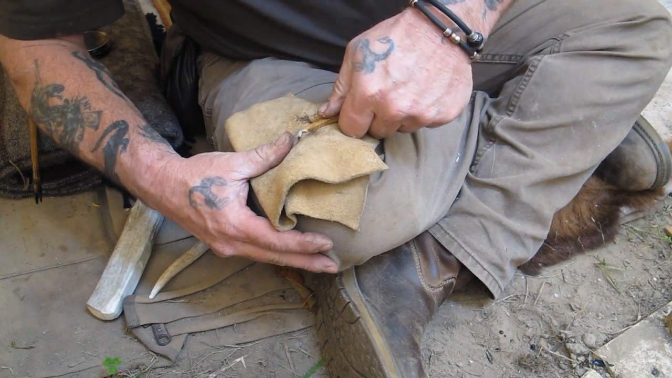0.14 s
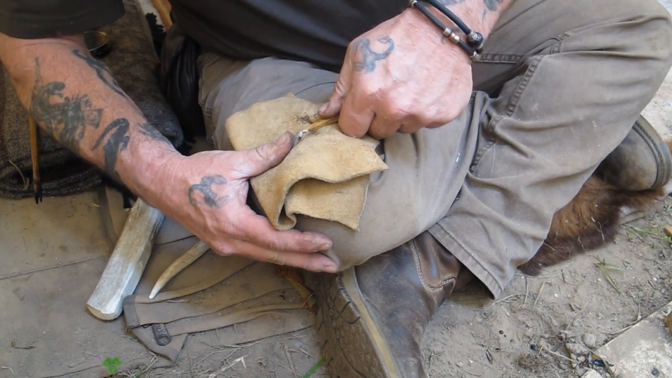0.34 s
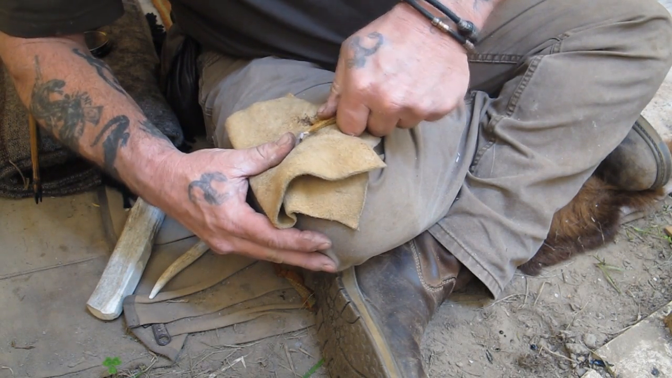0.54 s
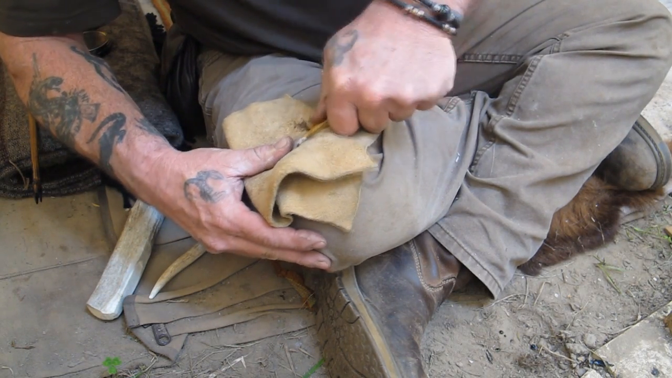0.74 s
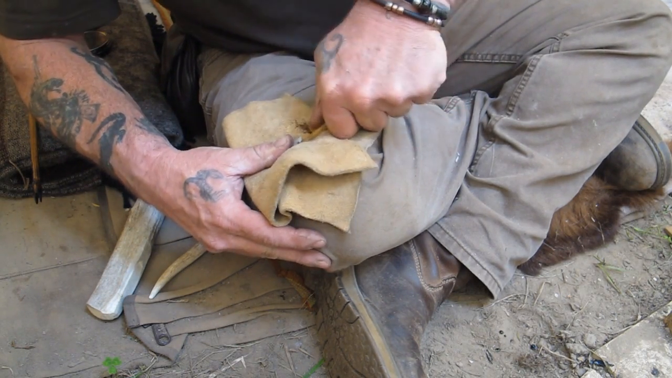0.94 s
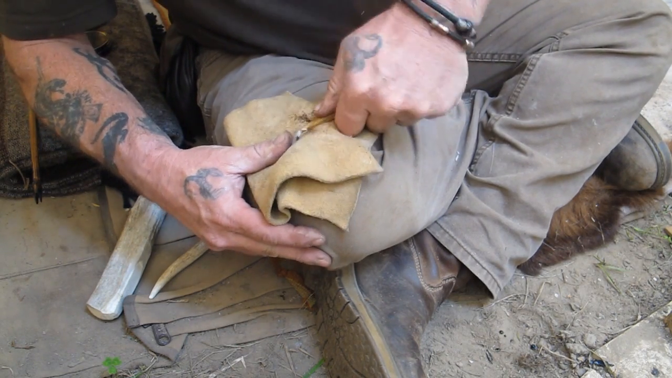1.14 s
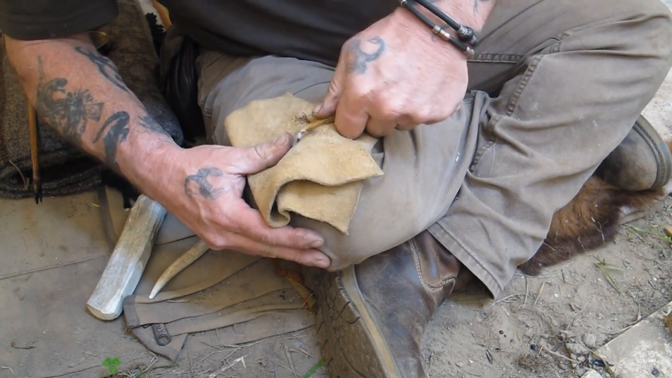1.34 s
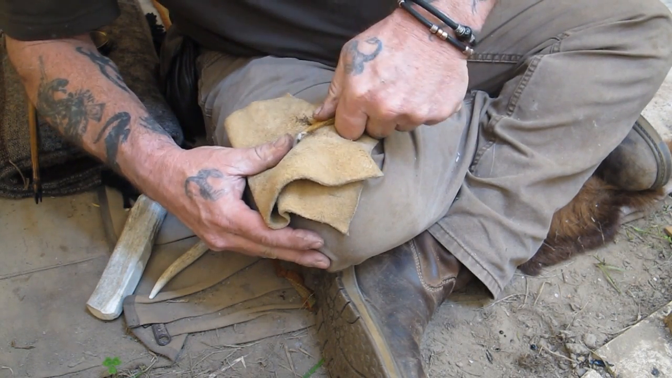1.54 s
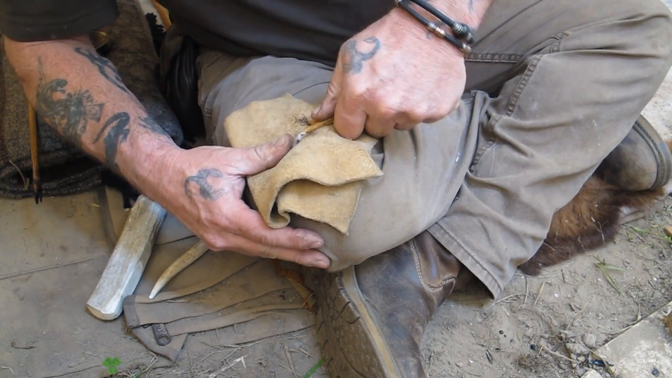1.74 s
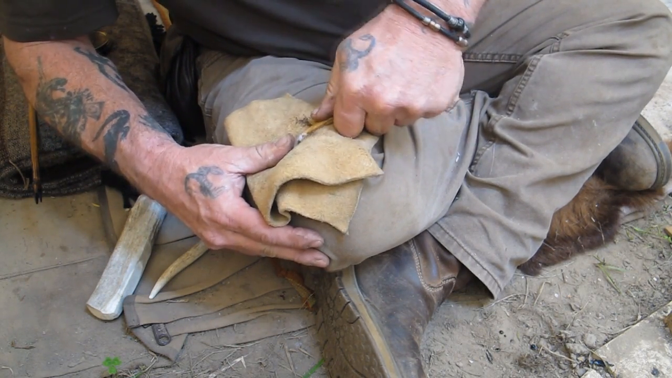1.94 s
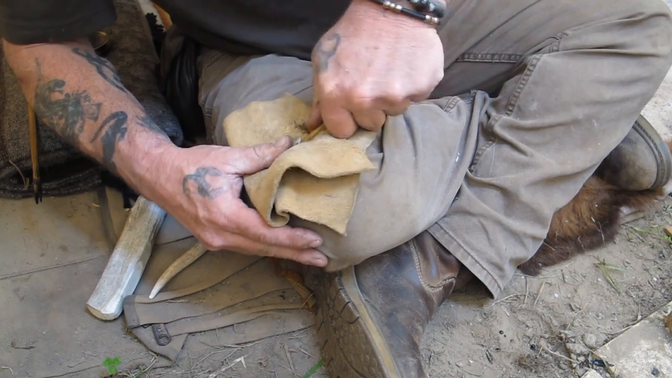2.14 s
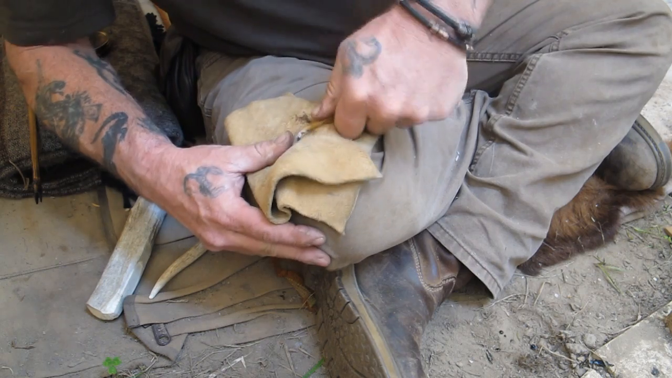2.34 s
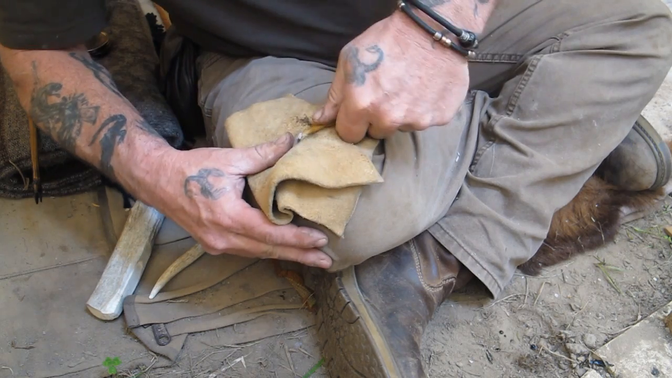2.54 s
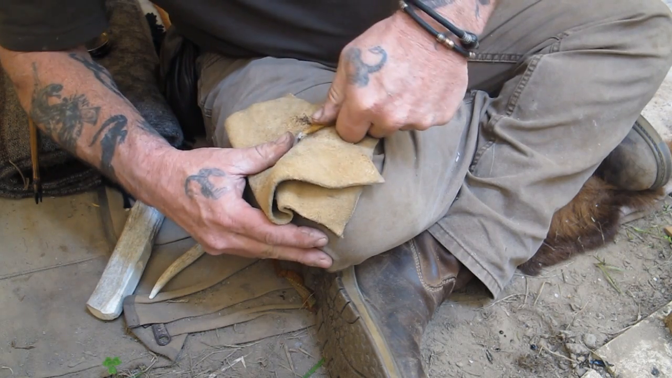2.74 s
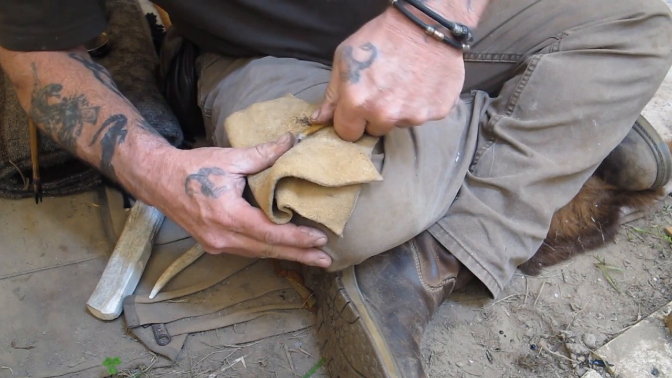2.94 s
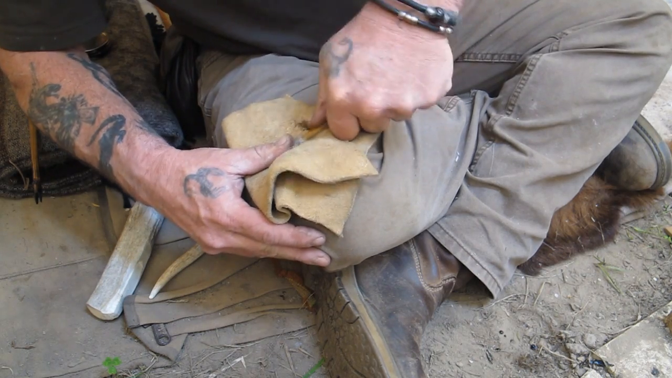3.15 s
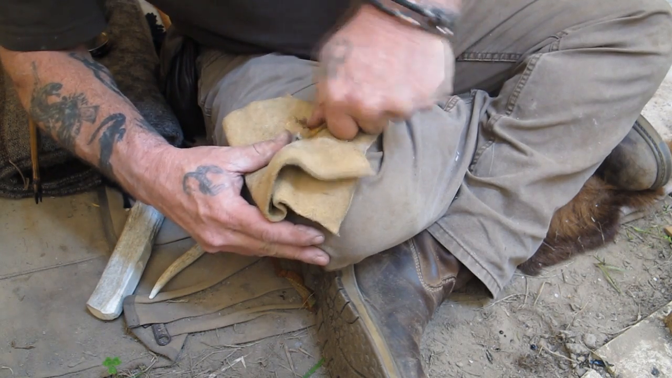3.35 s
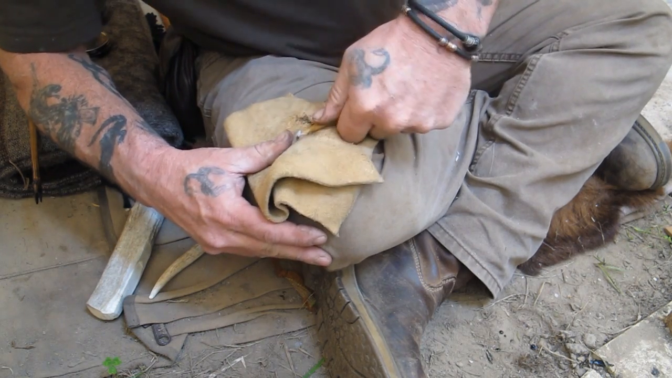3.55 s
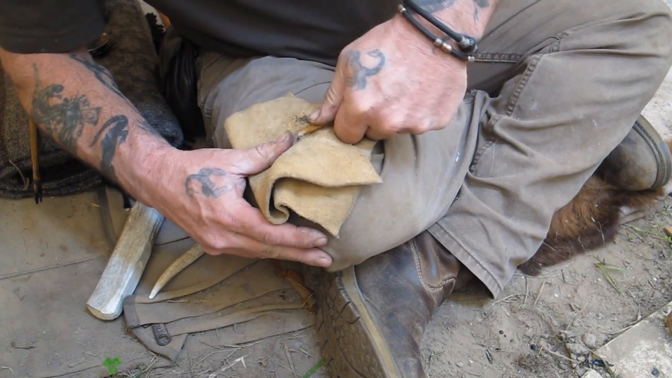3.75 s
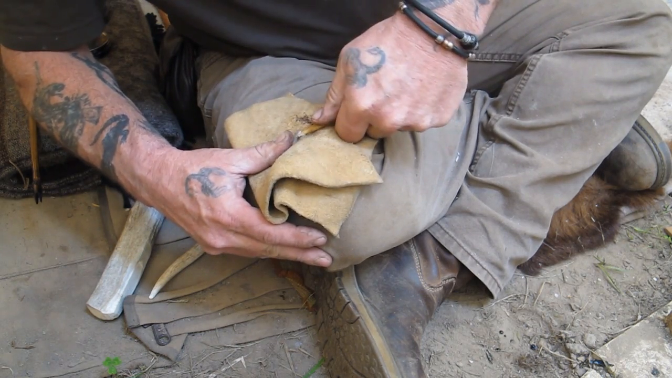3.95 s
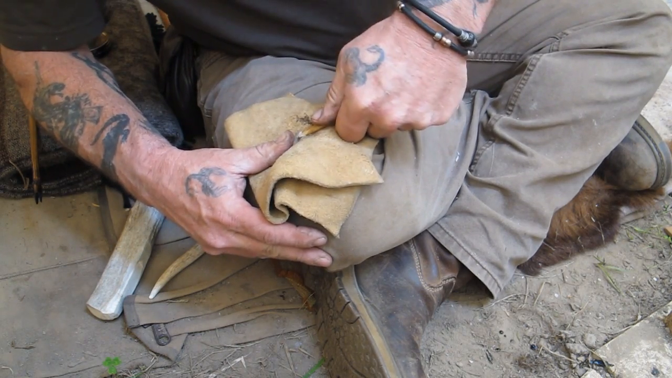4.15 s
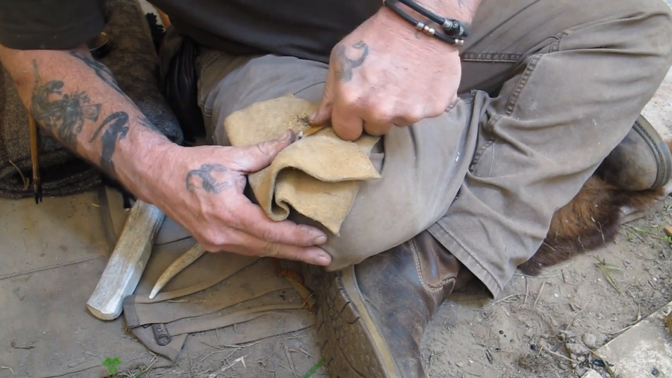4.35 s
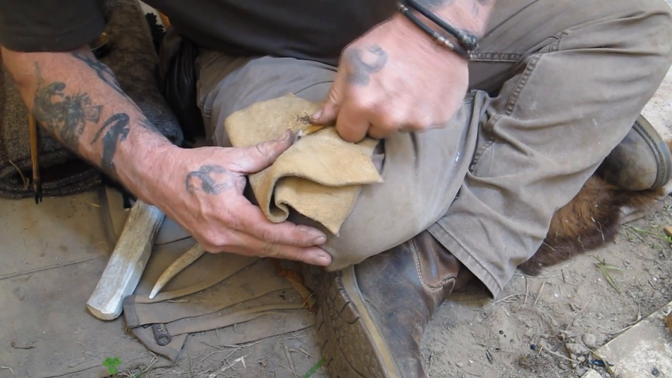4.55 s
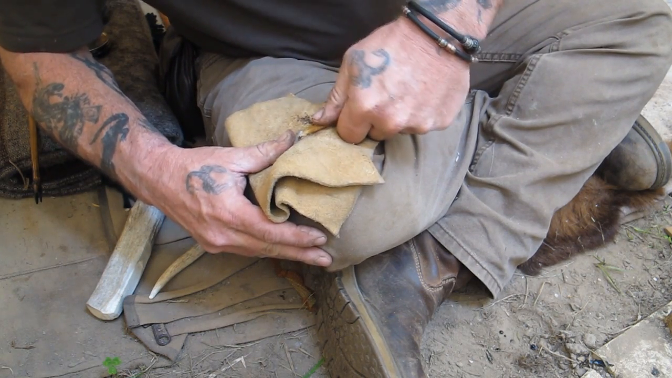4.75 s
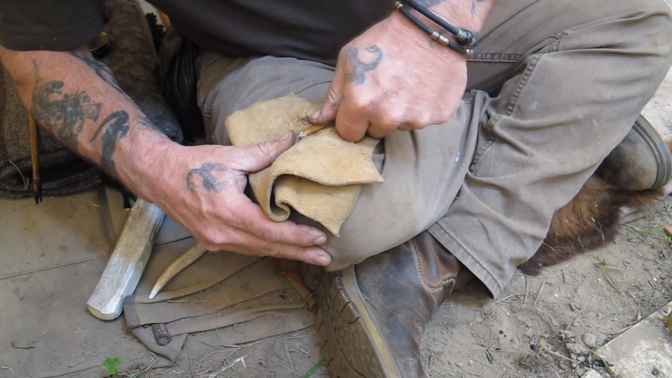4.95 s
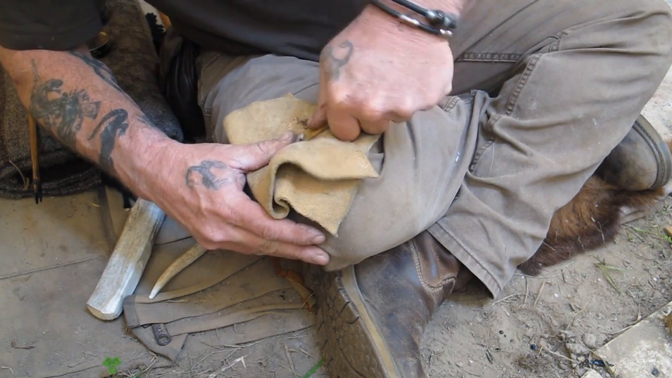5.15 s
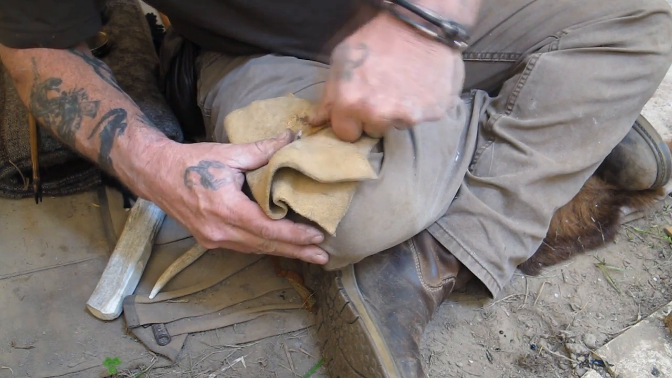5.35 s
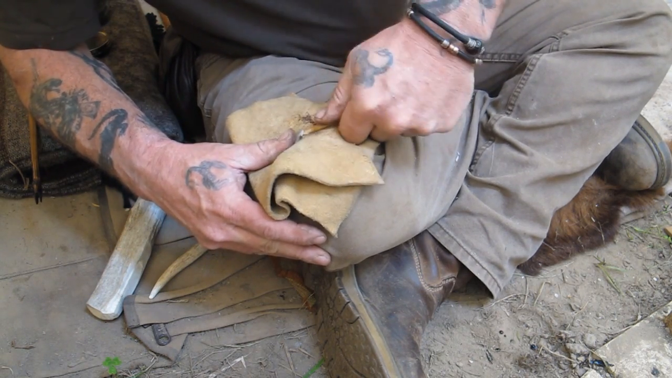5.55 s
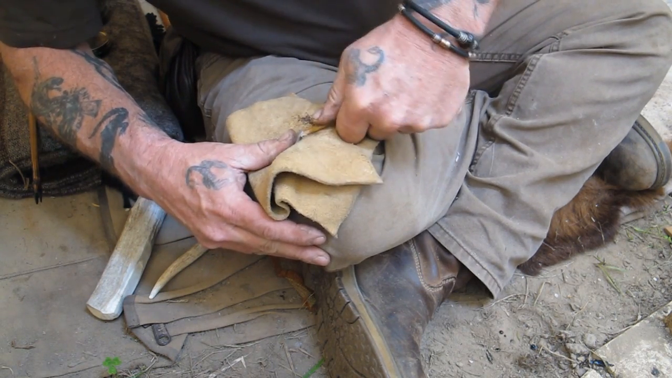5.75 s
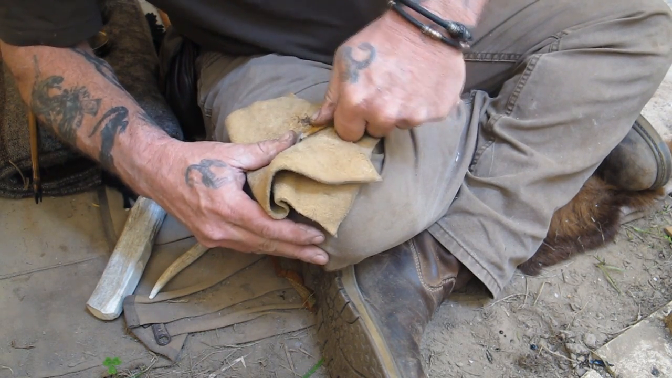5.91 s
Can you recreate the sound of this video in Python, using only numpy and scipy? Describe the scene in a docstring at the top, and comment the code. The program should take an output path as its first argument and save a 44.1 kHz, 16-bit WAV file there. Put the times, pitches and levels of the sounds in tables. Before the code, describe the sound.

Sharp, glassy snaps of stone flaking about once a second, with tiny ticking crumbs and faint leather creaks in a quiet yard.

```python
"""Small flakes snap off a stone point as an antler tine presses on it, over a leather pad on a knee.
Each flake is two close impulses that ring a bank of pad, tine and stone resonances.
Crumbs and grit are tiny impulses; the tine's one slide and the creaking leather are shaped noise.
A quiet yard adds a ground bounce, a short noise tail, air, a hum, a whine and far-off pulsing tones.
The recorder overloads on the hardest snaps and turns its gain down for a moment."""
import sys
import numpy as np
from scipy import signal
from scipy.io import wavfile
from scipy.ndimage import uniform_filter1d

SR = 44100
rng = np.random.default_rng(int(sys.argv[2]) if len(sys.argv) > 2 else 0)


def to_wav(sig):
    """Store sig (one row per channel, or 1-D mono) as 16-bit WAV at the path in sys.argv[1].

    Samples outside -1..1 are clipped; the rate is SR.
    """
    pcm = np.clip(np.atleast_2d(sig), -1, 1) * 32767
    pcm = np.round(pcm).astype(np.int16)
    wavfile.write(sys.argv[1], SR, pcm.T)  # frames by channels


N = 268128
TIME = np.arange(N) / SR
STONE_HZ, STONE_FROM_HZ = 5250, 4000   # the stone's main pitch; resonances above 4000 Hz belong to the stone
RING_SIZE = 1024   # samples in one strike
CUTOFF_HZ = 16000


def flakes(echo_blur=3.2, echo_shift=1.07, echo_db=-10):
    """A flake starts and breaks free in two cracks; returns the direct sound and a broader one for the yard."""
    # The flakes: start_s, pad_thud_db, tine_knock_db, body_db, stone_ring_db, chip_edge_db,
    # stone_pitch_hz, top_hz, second_crack_lag_ms, second_crack_db (against the first crack)
    snaps = [(0.9793, 7.5, 17.5, 13, 22.5, 4.5, 5230, 14700, 0.85, -13),
             (2.1806, 11, 8, -1.5, 13.5, 3, 5380, 8440, 0.97, 10),
             (2.2282, -16, -15, -3, 9, 9, 5000, 12400, 0.82, -7),
             (3.282, 4.5, 18, 8.5, 20.5, 6.5, 5250, 14100, 0.61, -17.5),
             (4.379, -12, -5, 12, 19, 6, 5040, 8440, .9, 8.5),
             (4.678, -22, -2, -3, -5.5, -34, 4980, 7500, 0.804, -9),
             (5.2444, 8, 17.5, -10.5, 19, 8, 5110, 11400, 0.24, 8)]
    # The pitches where the five levels above apply, from pad thud to chip edge: pitch_hz
    register_hz = [400, 1300, 2900, 5100, 8200]
    direct, sent = np.zeros((2, 2, N))
    for start_s, *register_db, stone_hz, top_hz, lag_ms, second_db in snaps:
        levels = list(zip(register_hz, register_db))
        level_db_at = lambda hz: at_hz(levels, hz)
        # a slower break is duller
        force = butter(clicks(lag_ms, second_db), top_hz, "low", order=6)
        add(direct, start_s, strike(force, level_db_at, stone_hz))
        echo = strike(force, level_db_at, stone_hz * echo_shift, echo_blur)
        add(sent, start_s, from_db(echo_db) * echo)
    return direct, sent


def clicks(lag_ms, second_db):
    """Two impulses that share one unit of energy."""
    at = np.arange(RING_SIZE)
    first = at == 0
    second = at == round(abs(lag_ms) * SR / 1000)
    pair = first + from_db(second_db) * second
    return pair / np.sqrt(np.sum(pair ** 2))


def strike(force, level_db_at, stone_hz=STONE_HZ, blur=1):
    """A force rings pad, tine and stone; the grip shifts the stone's pitch, blur widens every resonance."""
    # Pad, tine and stone, damped by the hand: pitch_hz (stone rows shift), width_hz (before blur),
    # level_db (before the force's own level), left_minus_right_db
    resonances = [(394, 98, 7, 1), (644, 83, -11.5, 2), (975, 61, -3, 3.5), (1174, 88, 3, 0),
                  (1514, 290, -0.5, -3.5), (1817, 263, 4.5, 2), (2745, 630, 0, -1.5), (3360, 1080, -5, 0),
                  (4490, 510, 4.5, 5.5), (5250, 307, 10.5, 5), (6420, 430, -6, -18), (7400, 660, 0.5, -9),
                  (8900, 570, 2, -7), (10480, 1960, -4.5, 0.5), (14870, 2000, -17, 4)]
    # How much later the treble reaches the left ear: pitch_hz, lag_ms
    ear_lag = [(3000, 0), (4600, .015), (5300, .05), (9000, .02)]
    out, at = np.zeros((2, RING_SIZE)), np.arange(RING_SIZE)
    for k, (hz, width, db, side_db) in enumerate(resonances):
        pitch, sign = hz, 1   # pad and tine move with the force
        if hz > STONE_FROM_HZ:
            # the stone's resonances alternate in sign
            pitch, sign = hz * stone_hz / STONE_HZ, (-1) ** (k + 1)
        gain = from_db(db + level_db_at(hz)) / np.sqrt(blur)
        right = resonate(force, pitch, width * blur) * gain
        lag_samples = at_hz(ear_lag, hz) * SR / 1000
        left = np.interp(at - lag_samples, at, right, left=0)
        out += sign * pan(side_db) * [left, right]
    return out


def crumbs(level_db=18, rebound_ms=4.5, rebound_db=-12, onset_s=0.00063):
    """Crumbs break off the edge, singly or in a short fading run; the tine catches again just after each."""
    # The edge crumbles under the tine: start_s (before onset_s), level_db (before level_db is added),
    # centre_hz, run_s (length of the run of grains; 0 is a single grain)
    ticks = [(0.6657, -31, 1030, 0), (1.2057, -39.5, 5100, .039), (2.142, -35.5, 4700, 0.003),
             (2.384, -35, 4770, 0.0057), (2.971, -31, 4440, 0), (3.2224, -26, 5200, 0),
             (3.276, -24, 5000, .003), (3.3208, -20.5, 5200, 0), (3.9972, -28, 2100, 0.018),
             (4.4424, -25.5, 7350, 0.0013), (4.485, -35.5, 4870, 0), (4.684, -26, 4400, .008),
             (4.8761, -35, 4740, 0), (5.1446, -35.5, 5200, .027), (5.24, -22, 5470, 0),
             (5.5126, -37, 2100, 0.0014), (5.7958, -37.5, 4930, 0), (5.847, -33.5, 7460, 0.0081),
             (5.98, -39, 7400, 0.0035)]
    longest_gap_s, fade_db_per_s = .015, 130   # within a run; later grains are weaker
    out = np.zeros((2, N))
    for start_s, tick_db, centre_hz, run_s in ticks:
        grain_count = 1 + int(np.ceil(run_s / longest_gap_s))
        for after_s in np.linspace(0, run_s, grain_count):
            db = tick_db + level_db - fade_db_per_s * after_s
            crumb = chip(clicks(rebound_ms, rebound_db), db, centre_hz)
            add(out, start_s + onset_s + after_s, crumb)
    return out


def chip(force, db, centre_hz, below_db=14, above_db=6, top_ratio=1.87):
    """A tiny chip excites the resonances near its own pitch; a low, soft touch has little treble."""
    def level_db_at(hz):
        """Fall away from the centre by below_db or above_db per octave."""
        octaves = np.log2(hz / centre_hz)
        return db + min(below_db * octaves, -above_db * octaves)
    top_hz = min(top_ratio * centre_hz, CUTOFF_HZ)
    return strike(butter(force, top_hz, "low", order=3), level_db_at)


def grit(level_db=-34, spread_db=6, centre_hz=5500, rebound_ms=3, rebound_db=-6, count=36):
    """Faint grains of stone crush under the tine at random moments."""
    out = np.zeros((2, N))
    for when, size, pitch in 2 * rng.random((count, 3)) - 1:   # each from -1 to 1
        start_s = (when + 1) / 2 * N / SR
        grain_hz = centre_hz * 2 ** (pitch / 2)   # up to half an octave either way
        grain_db = level_db + spread_db * size
        add(out, start_s, chip(clicks(rebound_ms, rebound_db), grain_db, grain_hz))
    return out


def slide(low_hz=1400, high_hz=6000, grains_per_s=4000, ring_width=600, ring_db=-3):
    """The tine drags along the edge to its first seat: dense fine grains, with a little of the stone's ring."""
    start_s, length_s, attack_s, release_s, level_db = 0.613, 0.19, .03, 0.28, -60
    grains = rng.standard_normal(N) * (rng.random(N) < grains_per_s / SR)
    rub = butter(grains, [low_hz, high_hz], "band")
    rub = rms_one(rub + from_db(ring_db) * resonate(rub, STONE_HZ, ring_width))
    return from_db(level_db) * swell(start_s, length_s, attack_s, release_s) * rub * pan(1.5)


def leather(slip_s=0.0098, uneven=0.17, steady=0.44):
    """The pad sticks and slips under the hand; each slip is a short dull rub."""
    # Resonances of the leather: pitch_hz, width_hz, level_db (against each other, before tilt)
    leather_modes = [(660, 260, 7.5), (1410, 390, -2), (1610, 160, -0.5), (2790, 336, -10.5)]
    # The hand bears down: start_s, length_s (before the release), level_db, tilt_db_per_octave
    presses = [(2.422, .3, -59.5, 5), (3.479, .5, -55, -2.5), (4.64, .27, -58, 3.5)]
    attack_s, release_s = 0.16, 0.17
    grip_from_s, grip_db = 2.1, -64   # from here on the grip keeps the pad under light strain
    slips_per_s, slowing = 28, 0.31   # under the light grip; a harder press sticks longer (exponent)
    grip = from_db(grip_db) * swell(grip_from_s, N / SR, attack_s, release_s)
    pushes = [from_db(db) * swell(start_s, length_s, attack_s, release_s)
              for start_s, length_s, db, _ in presses]
    strain = np.maximum(grip, sum(pushes))
    load = np.maximum(strain, from_db(grip_db))
    tilt_db = sum(push * row[-1] for push, row in zip(pushes, presses)) / load
    rate = slips_per_s * (from_db(grip_db) / load) ** slowing
    slip_count = np.cumsum(rate * np.exp(uneven * drift(10))) / SR
    since_slip = slip_count % 1 / rate
    rub = rng.standard_normal(N) * (steady + np.exp(-since_slip / slip_s))
    body = 0
    for hz, width, db in leather_modes:
        mode_gain = from_db(db + tilt_db * np.log2(hz / 1000))
        patchy_rub = rub * from_db(3.4 * drift(14))
        body = body + mode_gain * resonate(patchy_rub, hz, width)
    return strain * rms_one(body)


def yard(x, t60=0.074, gap_s=0.0014, wide_hz=2200, dull_hz=11000):
    """Ground, body and nearby things scatter a brief tail, alike in both ears in the bass."""
    t = TIME[:SR // 4]
    fade = (t > gap_s) * from_db(-60 * t / t60)   # down 60 dB at t60 seconds
    mid, side = rng.standard_normal((2, len(t)))
    wide = mid + butter(side, wide_hz, "high") * [[1], [-1]]
    scatter = butter(wide, dull_hz, "low") * fade
    return signal.fftconvolve(x, scatter / np.sqrt(np.sum(fade ** 2)), axes=1)[:, :N]


def air(patchy_db=1.0, level_db=-51):
    """Distant outdoor rumble, alike in both ears, under a soft hiss that is not."""
    # Colour of the air: pitch_hz, level_db per Hz (against each other)
    air_colour = [(15, -37), (25, -5), (49, -2.5), (137, -4), (195, -13.5), (326, -10), (363, -14),
                  (394, -12), (677, -16), (1100, -14.5), (1230, -21.5), (1610, -22.5), (2160, -25),
                  (6920, -28), (16000, -43.5)]
    # How alike the two ears are: pitch_hz, likeness (1 is the same, 0 is unrelated)
    likeness = [(60, 0.95), (130, 0.9), (290, 0.82), (640, 0.84), (1410, 0.56), (3100, 0.021),
                (6820, 0.027), (15000, 0.047)]
    # Balance between the ears: pitch_hz, left_minus_right_db
    balance = [(60, 1.5), (110, 1.5), (200, 0), (380, 0), (700, -0.5), (1290, 0.5), (2380, 1), (4400, 4.5),
               (8120, -6.5), (15000, 5.5)]
    out, edges = 0, 22 * 2 ** np.arange(0, 9.9, .5)   # half-octave bands
    white = rng.standard_normal((2, 2, N))
    for k, (low, high) in enumerate(zip(edges, edges[1:])):
        # neighbouring bands use different noise
        mid, side = butter(white[k % 2], [low, high], "band")
        hz = np.sqrt(low * high)
        alike = np.clip(at_hz(likeness, hz), 0, 1)
        spread = np.sqrt((1 - alike) / (1 + alike)) * side * [[1], [-1]]
        gain = from_db(at_hz(air_colour, hz) + patchy_db * drift(4.4)) * pan(at_hz(balance, hz))
        out = out + gain * (mid + spread)
    return from_db(level_db) * rms_one(out)


def tones(hum_hz=55, hum_width=9, hum_db=-63, whine_hz=8810, waver_hz=35, whine_db=-75.5):
    """A far, wavering hum of narrow noise and a thin electronic whine of steady level, slightly unsteady pitch."""
    hum = resonate(rng.standard_normal(N), hum_hz, hum_width)
    hum = resonate(hum, hum_hz, hum_width)
    whine = sine(whine_hz + waver_hz * drift(80))
    return from_db(hum_db) * rms_one(hum) + from_db(whine_db) * whine * pan(-2.5)


def far_tones(pulse_hz=7, wander=.01, flutter=.018):
    """Two thin far-off tones pulse and waver, barely above the air."""
    # The tones: start_pitch_hz (before wavering), glide_hz_per_s, level_db (before pulsing)
    far_pitches = [(2100, -52, -73), (3220, 25, -73.5)]
    start_s, length_s, attack_s, release_s = 2.3, 2.6, .6, 1.3
    out = 0
    for hz, glide_hz_per_s, db in far_pitches:
        pulse = 1 + np.sin(2 * np.pi * pulse_hz * TIME + drift(4))
        pulse = pulse * from_db(1.5 * drift(25))
        waver = 1 + wander * drift(12) + flutter * drift(150)
        pitch = (hz + glide_hz_per_s * (TIME - start_s)) * waver
        out = out + from_db(db) * pulse * sine(pitch)
    return swell(start_s, length_s, attack_s, release_s) * out


def from_db(db):
    """Decibels to gain."""
    return 10 ** (np.asarray(db) / 20)


def rms_one(x):
    """Scale to an average strength (rms) of 1."""
    return x / np.sqrt(np.mean(x ** 2) + 1e-20)


def at_hz(points, hz):
    """Read a table between its rows, with pitch on a log scale."""
    table_hz, values = np.array(points)[:, 0], np.array(points)[:, 1]
    return np.interp(np.log(hz), np.log(table_hz), values)


def pan(db):
    """Left and right gains for a level difference; positive is louder on the left."""
    return from_db(np.array([[db], [-db]]) / 2)


def delay(x, ms):
    """The same sound, a whole number of samples later."""
    lag = max(int(round(ms * SR / 1000)), 0)
    silence = np.zeros(x.shape[:-1] + (lag,))
    return np.concatenate([silence, x[..., :N - lag]], axis=-1)


def butter(x, hz, kind, order=2):
    """Butterworth filter: keeps the lows, the highs or a band."""
    safe_hz = np.clip(hz, 10, .45 * SR)
    return signal.sosfilt(signal.butter(order, safe_hz, kind, fs=SR, output="sos"), x + 1e-18)


def resonate(x, hz, width):
    """A resonance with gain 1 on top; a narrower one rings longer."""
    r = np.exp(-np.pi * width / SR)
    feed = np.array([1, 0, -1]) * (1 - r * r) / 2
    return signal.lfilter(feed, [1, -2 * r * np.cos(2 * np.pi * hz / SR), r * r], x)


def drift(rate):
    """A random curve with about rate turns a second, scaled to rms 1."""
    knots = rng.standard_normal(1024)
    return rms_one(np.interp(TIME * rate, np.arange(len(knots)), knots))


def sine(hz):
    """A tone that follows a pitch curve; rms 1."""
    return np.sqrt(2) * np.sin(2 * np.pi * np.cumsum(hz) / SR)


def swell(start_s, length_s, attack_s, release_s):
    """Attack, hold until length_s is over, release; height 1."""
    t = TIME - start_s
    return np.clip(t / attack_s, 0, 1) * np.clip(1 - (t - length_s) / release_s, 0, 1)


def add(out, start_s, sound):
    """Mix a short sound in at its start time."""
    start = int(np.clip(round(start_s * SR), 0, N - 1))
    out[:, start:start + sound.shape[1]] += sound[:, :N - start]


def scene(ground_ms=3.9, ground_db=-16, small_echo_db=-7):
    """Snaps, crumbs and grit with their bounce off the ground, over the quiet yard."""
    snaps, sent = flakes()
    small = crumbs() + grit()
    direct = snaps + small
    ground = from_db(ground_db) * delay(direct, ground_ms)
    tail = yard(sent + from_db(small_echo_db) * small)
    background = air() + tones() + far_tones()
    return direct + ground + tail + leather() + slide() + background


def gain_control(x, threshold_db=-16.0, ratio=1.65, release_s=0.22, attack_hz=12):
    """A burst of power turns the gain down; it creeps back over the next second."""
    power = uniform_filter1d(np.mean(x ** 2, axis=0), size=441)   # averaged over 10 ms
    over_db = np.maximum(10 * np.log10(np.abs(power) + 1e-12) - threshold_db, 1e-6)
    # hold each peak and let it die away with release_s
    held_db = np.exp(np.maximum.accumulate(np.log(over_db) + TIME / release_s) - TIME / release_s)
    return x * from_db(-ratio * butter(held_db, attack_hz, "low", order=1))


def record(dry):
    """Gain control, overload on the hardest peaks, and the top is cut."""
    loud = np.clip(gain_control(dry), -.95, .95)
    return signal.sosfilt(signal.ellip(10, .1, 80, CUTOFF_HZ, fs=SR, output="sos"), loud)


dry = scene()
out = record(dry)
to_wav(out)
```